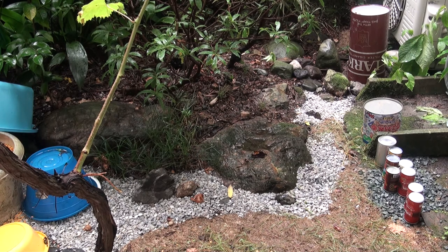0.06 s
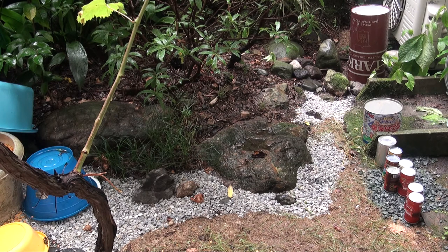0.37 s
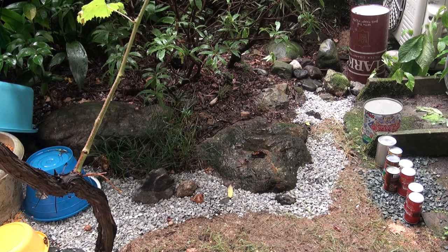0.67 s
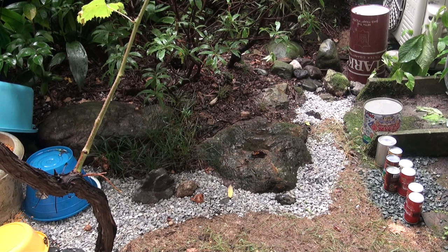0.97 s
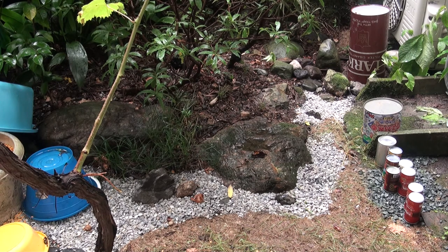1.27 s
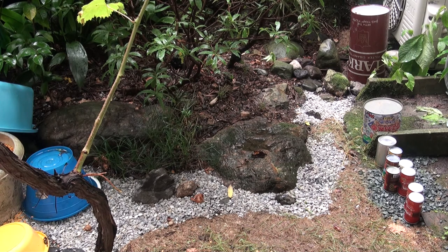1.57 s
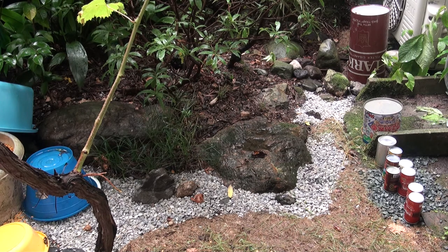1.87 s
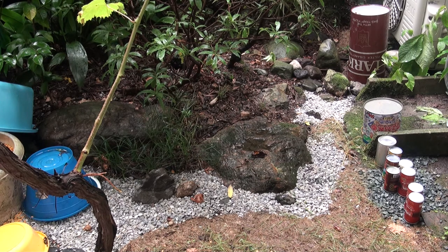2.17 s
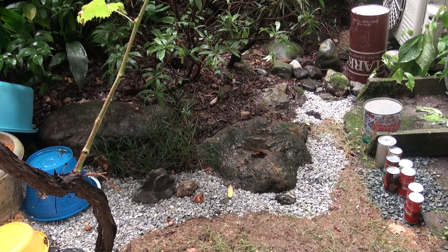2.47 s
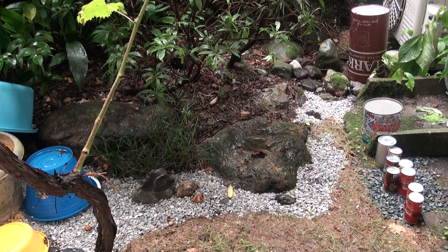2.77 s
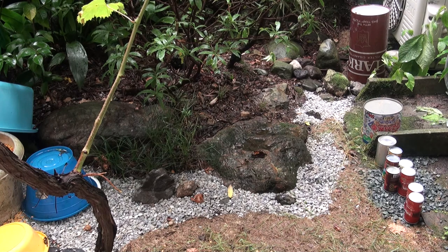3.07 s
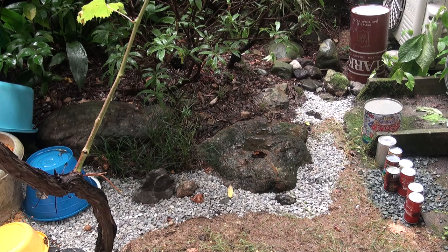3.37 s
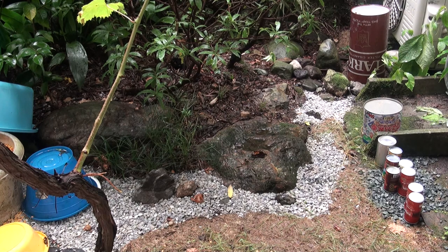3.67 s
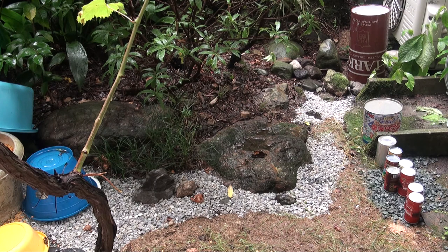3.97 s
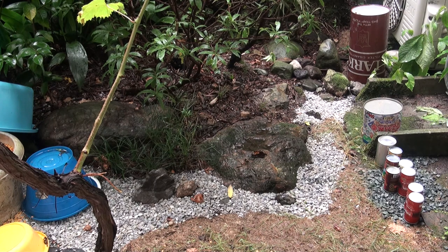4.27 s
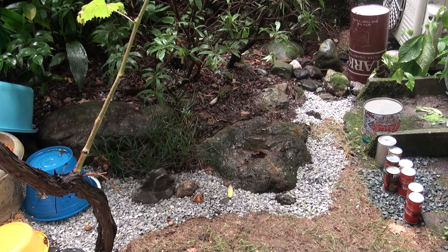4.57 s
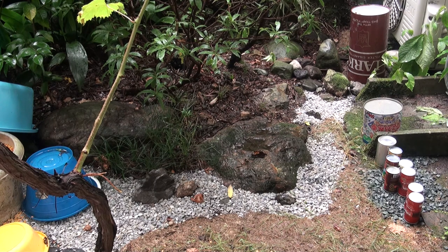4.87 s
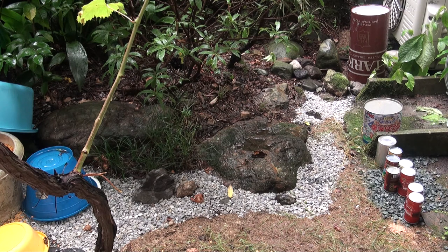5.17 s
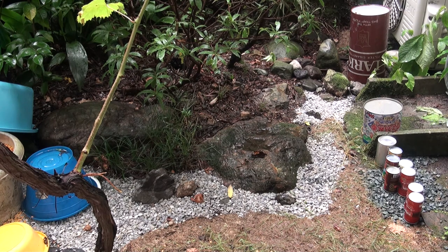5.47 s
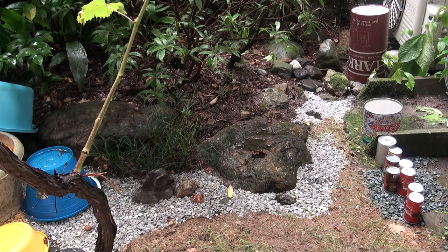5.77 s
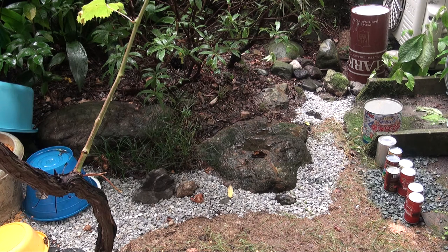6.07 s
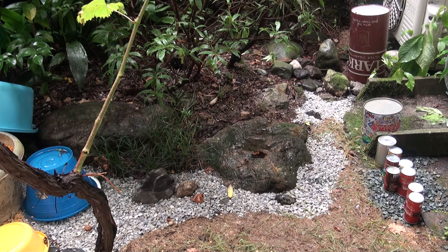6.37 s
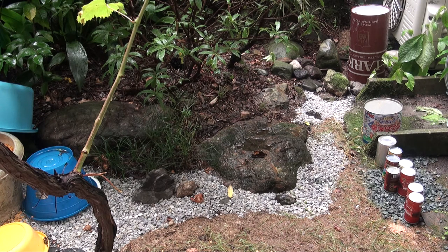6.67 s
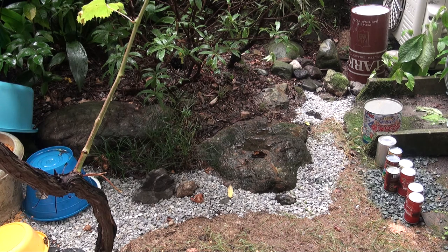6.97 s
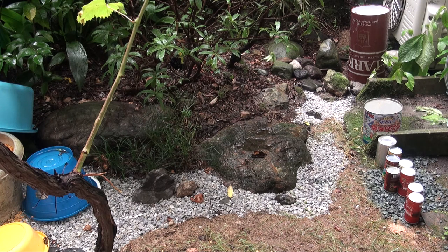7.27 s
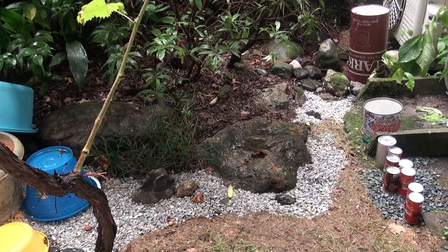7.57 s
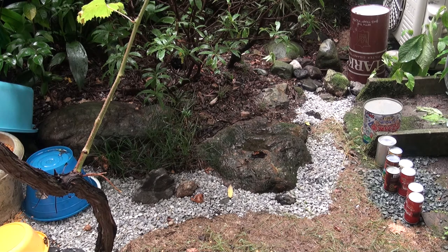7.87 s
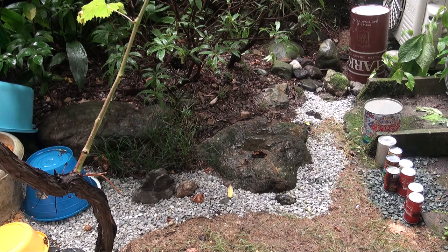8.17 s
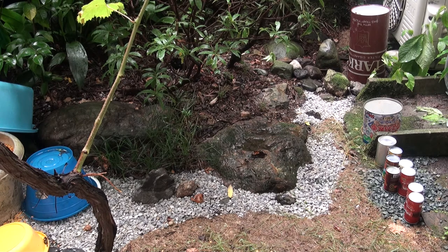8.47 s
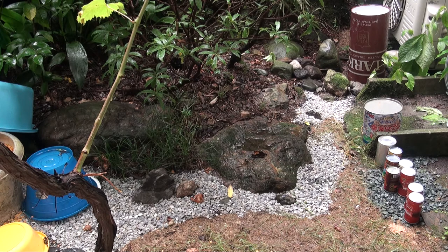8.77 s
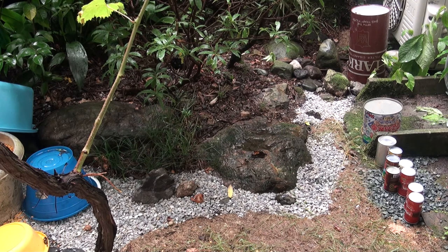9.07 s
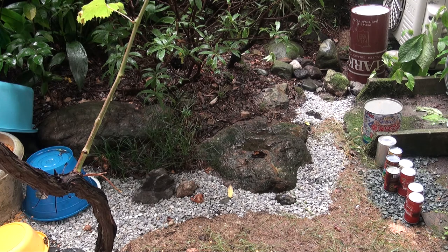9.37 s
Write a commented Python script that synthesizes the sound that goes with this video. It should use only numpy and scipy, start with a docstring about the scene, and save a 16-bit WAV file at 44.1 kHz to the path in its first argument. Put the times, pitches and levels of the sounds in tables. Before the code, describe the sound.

A steady, shrill wall of cicada song comes from the garden trees, a little stronger on the right. One insect pulses about eight times a second, and another slides early from a high whine into a sustained hiss. Near the middle there is one faint tap, then a more distant cicada swells into the chorus. A low, far rumble and light breeze on the microphone stay well in the background.

```python
"""A cicada's high whine opens into a shrill hiss, while another cicada throbs about eight times a second
between a low rattle and a brighter buzz. Each song is a train of tymbal clicks ringing a hollow abdomen.
A chorus fills the trees of the summer garden, a farther singer joins halfway, and leaves and walls
scatter it all. Beneath lie a distant rumble, a far engine, puffs of breeze and one faint tap."""
import sys
import numpy as np
from scipy import signal
from scipy.fft import rfft, irfft, next_fast_len
from scipy.io import wavfile
from scipy.ndimage import map_coordinates

SR = 44100
rng = np.random.default_rng(int(sys.argv[2]) if len(sys.argv) > 2 else 0)


def bounce(signal):
    """Save signal as a 16-bit WAV file at the path given by the first command-line argument."""
    frames = np.transpose(np.atleast_2d(signal))
    limited = np.clip(frames, -1, 1)
    pcm = np.round(limited * 32767).astype(np.int16)
    wavfile.write(sys.argv[1], SR, pcm)


N = 415863


# resonances of the abdomen while whining and while shrilling: frequency_hz, gain_db
WHINE_BODY = [(1000, -60), (4500, -42), (5680, -13.5), (5850, -4), (6020, -21), (6220, -8), (6390, 2),
              (6560, -0.5), (6720, -20), (8000, -7), (9600, -24), (9930, -11), (10200, -31), (15000, -66)]
SHRILL_BODY = [(1000, -70), (4500, -42), (6800, -18.5), (7500, -7), (7900, -1), (8750, -1.5), (9250, -6.5),
               (10000, -15.5), (10800, -26.5), (11300, -33.5), (12500, -37), (15500, -52)]

def near_cicada(switch_s=1.365, whine_db=-31, shrill_db=-28.5):
    """Source and filter: narrow resonances make clicks a whine, then a broad one makes them a shrill."""
    t = seconds()
    opened = rise(switch_s, 0.032)
    age_s = np.maximum(t - switch_s, 0)
    slide = .25 * (1 - rise(1.405, .05))
    overshoot = .04 * np.exp(-age_s / 1.1)
    pitch_ratio = 1 - slide + overshoot - .0012 * age_s  # slides up, settles, then slowly sags
    rate_hz = 528 + 2.4 * t + 1.56 * wobble(30.15)
    rough = tymbal(rate_hz, jitter_ms=0.042, spread_db=2)
    steady = tymbal(483 + .5 * wobble(1.5), jitter_ms=0.059, spread_db=1.2, limp=0.18)
    whine = radiate(rough, WHINE_BODY, right_db=7.5, lag=-15.5, scatter_db=-4, t60_s=0.19)
    whine = amp(whine_db - 0.3 * t) * whine + whine_tones(rate_hz)
    shrill = radiate(steady, SHRILL_BODY, right_db=6, lag=-16.5, scatter_db=9, t60_s=.25)
    shrill = amp(shrill_db - 0.08 * age_s) * glide(shrill, pitch_ratio)
    return np.sqrt(1 - opened) * whine + np.sqrt(opened) * shrill  # equal-power crossfade


# the whine's lower and upper tone: start_level_db, slope_db_per_s
WHINE_HARMONICS = [(-49.5, 3.5), (-41, -7)]

def whine_tones(rate_hz):
    """Resonance favours two harmonics of the click rate; the ring shifts from the upper to the lower."""
    turns = np.cumsum(rate_hz) / SR
    tones = 0
    for harmonic, (db, db_per_s) in zip((11, 12), WHINE_HARMONICS):
        flutter_db = 4.5 * np.array([wobble(71), wobble(70)])
        tones += amp(db + db_per_s * seconds() + flutter_db) * np.sin(2 * np.pi * harmonic * turns)
    return tones * amp([[-3], [3]])


# resonances of the abdomen, slack and tight: frequency_hz, gain_db
SLACK_BODY = [(500, -60), (1300, -33), (1900, -20), (2150, -10), (2350, -14.5), (2600, -5), (2950, .5),
              (3200, -0.5), (3430, -8.5), (4500, -23.5), (7000, -43), (14000, -67)]
TIGHT_BODY = [(500, -47), (1300, -28), (1720, -16), (1900, -14), (2200, -5), (3000, -2.5), (3600, -3.5),
              (4100, -1), (4600, -0.5), (4950, 2), (5200, -2.5), (5700, 2), (7200, -6.5), (9500, -11),
              (11700, -14), (15000, -41)]
# the pumping pace, held until the next row: start_s, throbs_per_s
THROB_PACE = [(0, 7.804), (.8, 8.196), (1.45, 7.455), (3.09, 8.14), (3.81, 7.854), (5.08, 7.355),
              (5.35, 7.918), (6.86, 7.582), (8.71, 7.848)]

def throbbing_cicada(rattle_db=-40, buzz_db=-38.5, first_tight_s=0.02213):
    """Amplitude modulation: the pumping abdomen rattles low when slack and buzzes bright when tight."""
    start_s, pace = np.transpose(THROB_PACE)
    row = np.searchsorted(start_s, seconds(), side="right") - 1
    throbs = np.cumsum(pace[row]) / SR
    phase = 2 * np.pi * (throbs - first_tight_s * pace[0])
    slack = (1 - np.cos(phase)) / 2
    choked = (1 + np.cos(phase + 0.403)) / 2  # the rattle fails just before the tightest moment
    slow = tymbal(167 + 20 * choked + 3.5 * wobble(5), jitter_ms=.17, spread_db=.5, limp=0.11)
    fast = tymbal(352 + 7 * wobble(12), jitter_ms=0.198, spread_db=2.4)
    slow *= amp(-13 * choked ** 3.2)
    fast *= amp(-13 * slack ** 1.34)
    rattle = radiate(slow, SLACK_BODY, right_db=3, lag=-17, scatter_db=0, t60_s=0.1)
    buzz = radiate(fast, TIGHT_BODY, right_db=5.5, lag=-17, scatter_db=3, t60_s=0.16)
    push_db = 2 * swell(5.45, 0.5)  # once it buzzes harder
    return amp(rattle_db) * rattle + amp(buzz_db + push_db) * buzz


def tymbal(rate_hz, jitter_ms, spread_db, limp=0, half_taps=8):
    """An impulse train: two tymbals click in turn, unequal in strength by the share limp."""
    turns = np.cumsum(rate_hz) / SR + rng.random()
    count = np.arange(1, int(turns[-1]))
    late, size = rng.standard_normal((2, 16384))[:, count]
    position = np.interp(count, turns, np.arange(N)) + late * jitter_ms * SR / 1000
    strength = amp(spread_db * size) * (1 + limp * (-1) ** count)
    # a windowed sinc places each click between samples
    taps = position.astype(int)[:, None] + np.arange(1 - half_taps, half_taps + 1)
    offset = taps - position[:, None]
    clicks = strength[:, None] * np.sinc(offset) * np.cos(np.pi * offset / half_taps / 2) ** 2
    return np.bincount(np.clip(taps, 0, N - 1).ravel(), clicks.ravel(), N)


def abdomen_ring(body, size=2048):
    """Minimum phase: folding the cepstrum turns a body's spectrum into its causal impulse response."""
    gain = amp(along(body, np.fft.rfftfreq(size, 1 / SR)))
    cepstrum = irfft(np.log(gain))
    cepstrum[1:size // 2] *= 2
    cepstrum[size // 2 + 1:] = 0
    return irfft(np.exp(rfft(cepstrum)))


def radiate(clicks, body, right_db, lag, scatter_db, t60_s):
    """Convolution: clicks ring the body, then arrive directly and scattered by leaves and walls."""
    length = SR // 8
    paths = rng.standard_normal((2, length)) * amp(-60 * np.arange(length) / SR / t60_s)
    paths *= amp(scatter_db) / np.linalg.norm(paths[0])
    direct = SR // 1000
    paths[0, direct + int(np.clip(round(lag), -direct, direct))] += 1  # lag: left delay in samples
    paths[1, direct] += 1
    paths = signal.fftconvolve(paths, abdomen_ring(body)[None], axes=1)
    paths *= amp([[-right_db / 2], [right_db / 2]]) / np.linalg.norm(paths, axis=1, keepdims=True)
    running = np.pad(clicks, (length, 0), mode="reflect")  # the song is already under way
    song = signal.oaconvolve(np.float32(running[None]), np.float32(paths), axes=1)
    return unit(song[:, length:length + N])


# singers in the trees: click_rate_hz, relative_level_db, right_louder_db, left_delay_samples
TREE_SINGERS = [(386.5, 2.5, 5.5, -15), (281.3, 2, 8, -18), (222.4, -0.5, 5, 8.5)]
# resonances of their abdomens: frequency_hz, gain_db
TREE_BODY = [(800, -70), (2200, -32), (3700, -16), (4500, -24), (5300, -22.5), (6300, -12), (6800, -11),
             (7800, 0), (8600, -0.5), (9300, -8.5), (11200, -31), (12600, -25), (15500, -52)]
# the blur of countless distant singers: frequency_hz, gain_db
BLUR_SPECTRUM = [(600, -40), (1300, -22.5), (1850, -17.5), (2120, -3.5), (2900, -4.5), (3400, -8.5),
                 (3900, 1.5), (4500, -10.5), (6500, -7), (9000, -5), (15000, -43)]

def chorus(level_db=-29.5):
    """Incoherent summation: each singer drifts at its own pace, and the farthest merge into noise."""
    voices = 0
    for rate_hz, db, right_db, lag in TREE_SINGERS:
        clicks = tymbal(rate_hz * (1 + .0009 * wobble(2)), jitter_ms=0.033, spread_db=2, limp=0.28)
        voices += amp(db) * radiate(clicks, TREE_BODY, right_db, lag, scatter_db=4.5, t60_s=0.29)
    blur = amp([[-44], [-41.5]]) * stereo_noise(BLUR_SPECTRUM)
    return amp(level_db + 0.36 * wobble(6.7)) * unit(voices) + blur


# resonances of the farther singer's abdomen: frequency_hz, gain_db
FAR_ABDOMEN = [(800, -70), (2400, -31), (3300, -14), (3650, -3.5), (4100, 0.5), (4600, -17), (5650, 1),
               (6050, -21), (6350, 2), (6700, -7.5), (10000, -30), (15000, -55)]

def far_cicada(joins_s=4.95, soft_db=-48.5, loud_db=-42.5, whine_db=-43):
    """Lower resonances give a lower song; it steps up halfway, and later a thin whine swells once."""
    song_db = soft_db + (loud_db - soft_db) * rise(joins_s, .12)
    clicks = tymbal(520 + 7 * wobble(8), jitter_ms=0.079, spread_db=3.5)
    song = radiate(clicks, FAR_ABDOMEN, right_db=4, lag=-14, scatter_db=4, t60_s=0.19)
    even = tymbal(526 + 2.8 * wobble(12), jitter_ms=0.023, spread_db=1)
    whine = radiate(even, WHINE_BODY, right_db=4, lag=-14.5, scatter_db=1, t60_s=.2)
    return amp(song_db + 0.97 * wobble(7)) * song + amp(whine_db) * swell(7.3, 0.88) * whine


# bands reinforced between the garden walls: centre_hz, width_hz, boost_db
WALL_MODES = [(1553, 31, 9), (1728, 23, 8.5), (2180, 19, 7), (2432, 17, 6.5), (2623, 29, 7.5),
              (2799, 36, 4.5), (2973, 52, 4.5), (3130, 30, 2.5), (3630, 20, 5), (7180, 30, 7.5),
              (7490, 29, 5.5), (7900, 25, 2), (8140, 28, 3), (8900, 25, 3.5)]

def wall_gain(hz):
    """Constructive interference: echoes between the walls lift a few narrow bands."""
    return amp(sum(db / (1 + (2 * (hz - centre) / width) ** 2) for centre, width, db in WALL_MODES))


# one light impact: start_s, level_db, t60_s
TAP_EVENTS = [(4.378, -45, 0.17)]
# its dull colour: frequency_hz, gain_db
TAP_SPECTRUM = [(300, -25), (700, -12), (880, -2), (1050, 2), (1250, -1), (1420, -4), (1570, 1),
                (1750, -14), (4000, -40)]

def tap():
    """Reverberant decay: the walls smear a faint tap into noise that dies exponentially."""
    t = seconds()
    decay = sum((t > start) * amp(db - 60 * np.abs(t - start) / t60) for start, db, t60 in TAP_EVENTS)
    return decay * stereo_noise(TAP_SPECTRUM)


# puffs of breeze on the microphone: centre_s, half_width_s, peak_db
BREEZE_PUFFS = [(1.42, 0.18, -42), (3.42, 0.15, -43), (4.85, 0.22, -55), (5.45, 0.25, -46.5),
                (7.5, 0.2, -46.5)]

def breeze(lull_db=-57.5):
    """Turbulence at the microphone: deep noise, whose puffs add in power to a steady draught."""
    puff_power = sum((amp(db) * swell(centre, width)) ** 2 for centre, width, db in BREEZE_PUFFS)
    turbulence = stereo_noise([(10, -4), (30, 0), (55, -18), (100, -27), (300, -72)])
    return np.sqrt(amp(lull_db) ** 2 + puff_power) * turbulence


def distant_rumble(start_db=-52.5, rise_db_per_s=0.1567):
    """Low-frequency ambient noise: the distance rumbles and slowly grows louder."""
    rumble = stereo_noise([(20, -1.5), (60, 0), (130, -6.5), (250, -10.5), (350, -14.5), (480, -13),
                           (620, -17), (1400, -16.5), (3000, -27), (12000, -50)])
    return amp(start_db + rise_db_per_s * seconds()) * rumble


def far_engine(nearest_s=6.44, peak_db=-57):
    """Narrow-band noise: a drone near 80 Hz swells and fades as a far engine passes."""
    drone = stereo_noise([(55, -26), (80, 4), (105, -24), (330, -24), (420, -17), (520, -19.5),
                          (2000, -57)])
    return amp(peak_db) * swell(nearest_s, 1.55) * drone


# likeness of left and right: frequency_hz, correlation
COHERENCE = [(60, 0.92), (130, 0.46), (290, 0.46), (640, 0.034), (1400, -0.08)]

def stereo_noise(spectrum):
    """Spatial coherence: noise shaped by (frequency_hz, gain_db), alike on both sides in the bass."""
    def mid_side_gain(hz):
        angle = np.arccos(np.clip(along(COHERENCE, hz), -1, 1)) / 2
        return amp(along(spectrum, hz)) * [np.cos(angle), np.sin(angle)]
    mid, side = filtered(rng.standard_normal((2, N)), mid_side_gain)
    return unit(np.array([mid + side, mid - side]))


def glide(x, ratio):
    """Resampling scales every frequency of a stereo song by a changing ratio."""
    return np.array([map_coordinates(side, [np.cumsum(ratio)], mode="mirror") for side in x])


def filtered(x, response):
    """Linear filtering: the spectrum of x times a frequency response."""
    size = next_fast_len(N + SR // 4)
    return irfft(rfft(x, size) * response(np.fft.rfftfreq(size, 1 / SR)), size)[..., :N]


def wobble(knots_per_s):
    """Smooth random modulation: a spline through Gaussian knots."""
    knots = rng.standard_normal(1024)
    coarse = np.arange(0, N + 256, 256)
    curve = map_coordinates(knots, [coarse * knots_per_s / SR], mode="mirror")
    return np.interp(np.arange(N), coarse, curve)


def along(points, hz):
    """Interpolation of (frequency_hz, value) points on a log frequency axis."""
    frequencies, values = np.transpose(points)
    return np.interp(np.log(hz + 1), np.log(frequencies + 1), values)


def swell(centre_s, width_s):
    """A Gaussian bell from 0 up to 1 and back."""
    return np.exp(-((seconds() - centre_s) / width_s) ** 2)


def rise(centre_s, width_s):
    """A logistic step from 0 to 1."""
    return (1 + np.tanh((seconds() - centre_s) / width_s / 2)) / 2


def seconds():
    """The time of every sample."""
    return np.arange(N) / SR


def amp(db):
    """Decibels to amplitude ratio."""
    return 10 ** (np.asarray(db) / 20)


def unit(x):
    """Normalisation to rms 1."""
    return x / np.sqrt(np.mean(x ** 2) + 1e-20)


def scene():
    """Superposition: the songs, coloured by the walls, add to the low background and the tap."""
    songs = throbbing_cicada() + near_cicada() + far_cicada() + chorus()
    background = (distant_rumble() + far_engine() + breeze()) * amp([[.7], [-.7]])
    return filtered(songs, wall_gain) + background + tap()


def record(dry):
    """Band limiting: the camera passes nothing above 15.7 kHz."""
    return filtered(dry, lambda hz: hz < 15700)


dry = scene()
out = record(dry)
bounce(out)
```